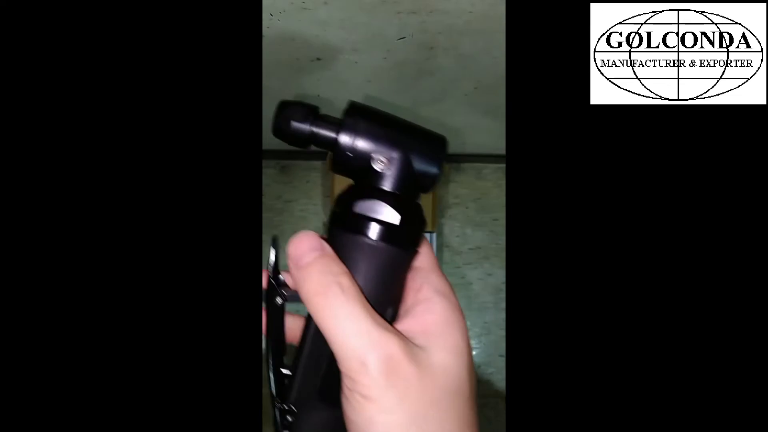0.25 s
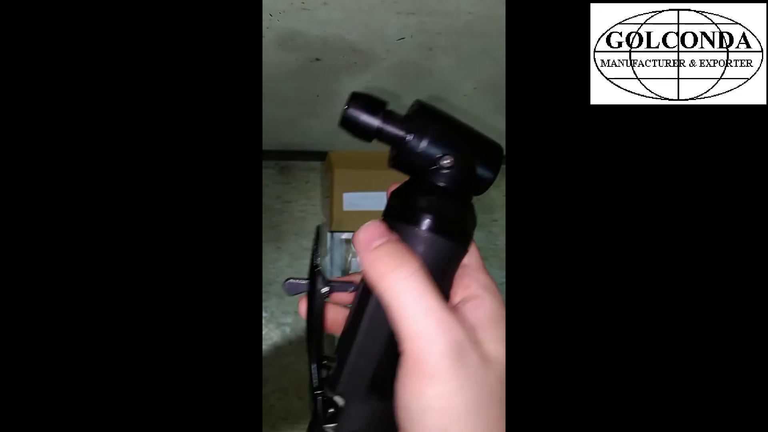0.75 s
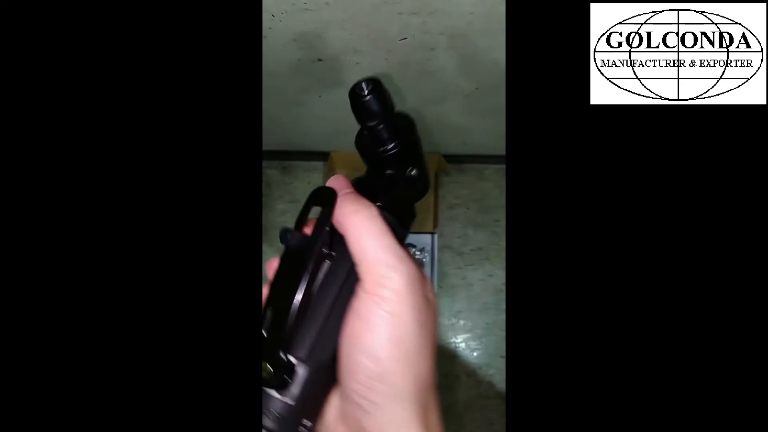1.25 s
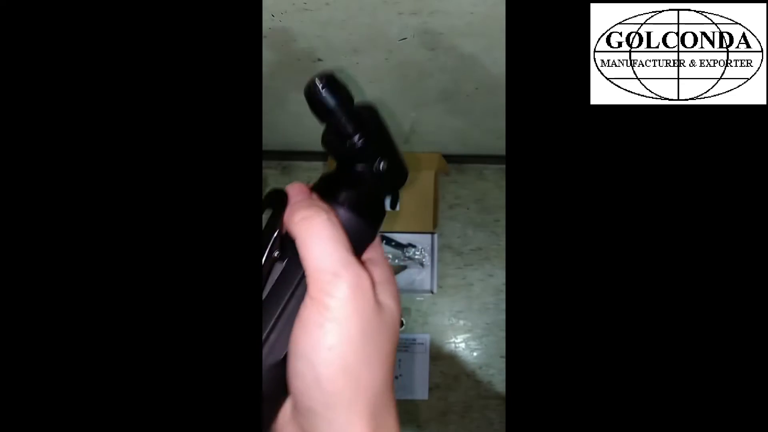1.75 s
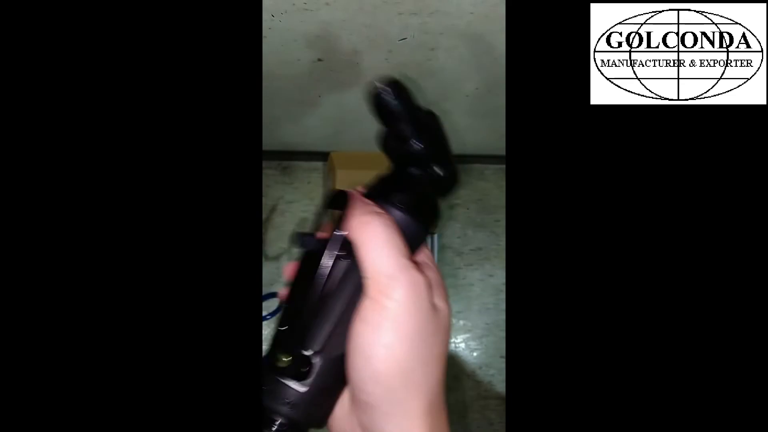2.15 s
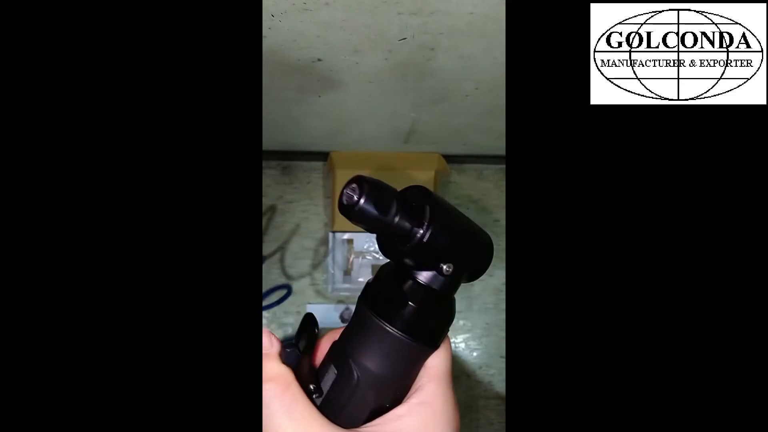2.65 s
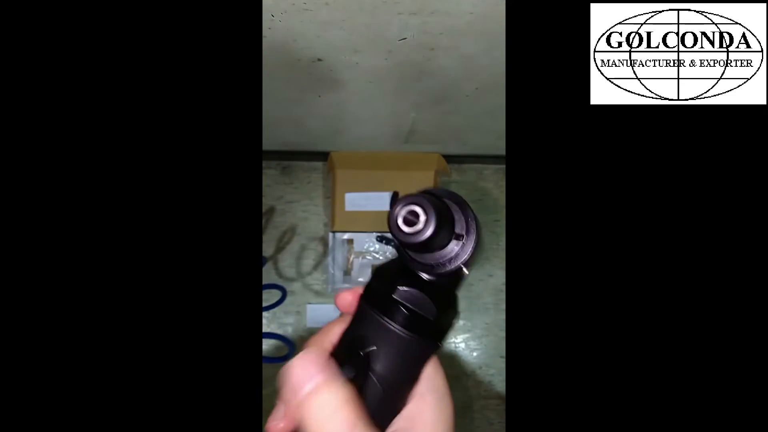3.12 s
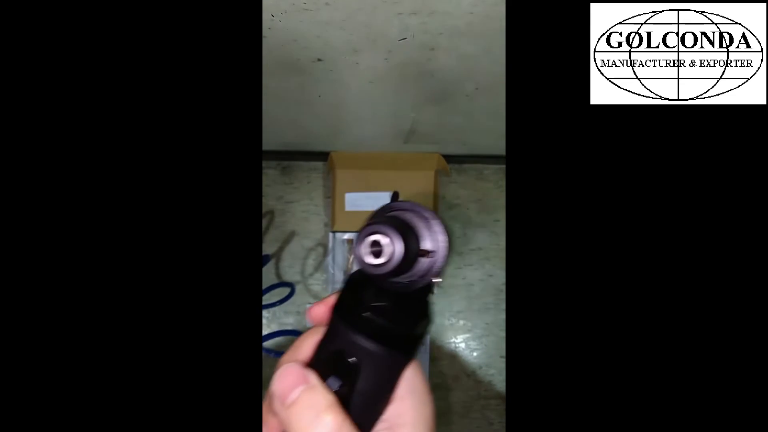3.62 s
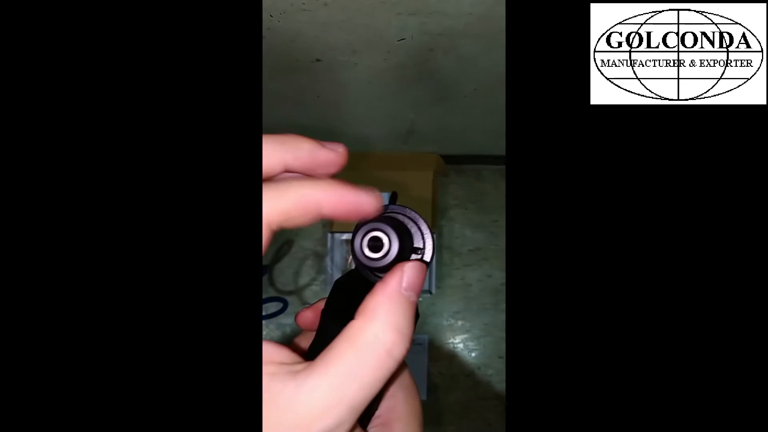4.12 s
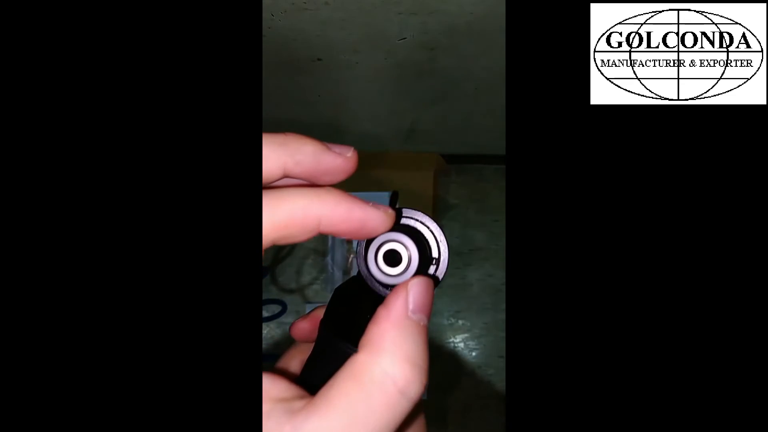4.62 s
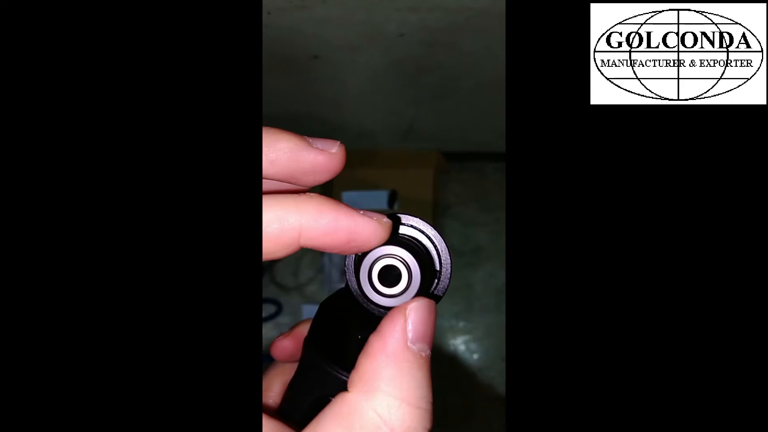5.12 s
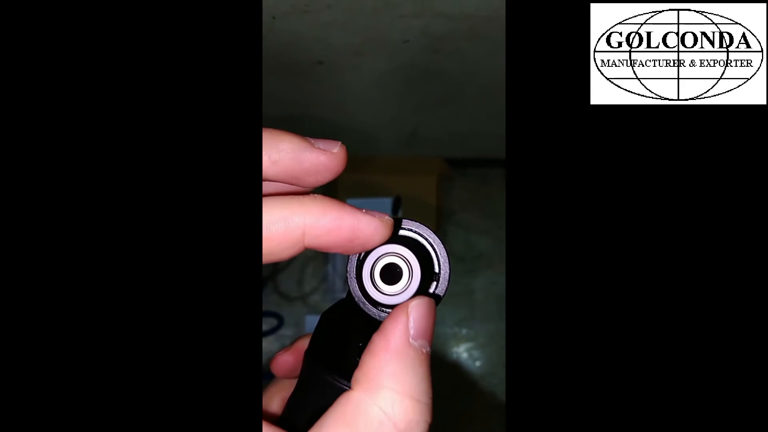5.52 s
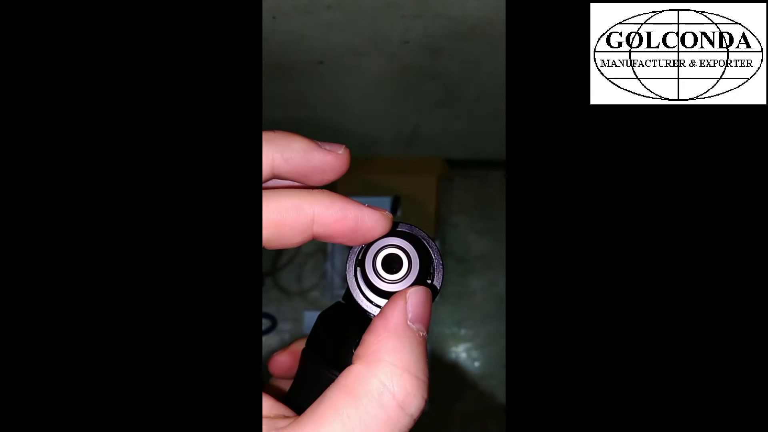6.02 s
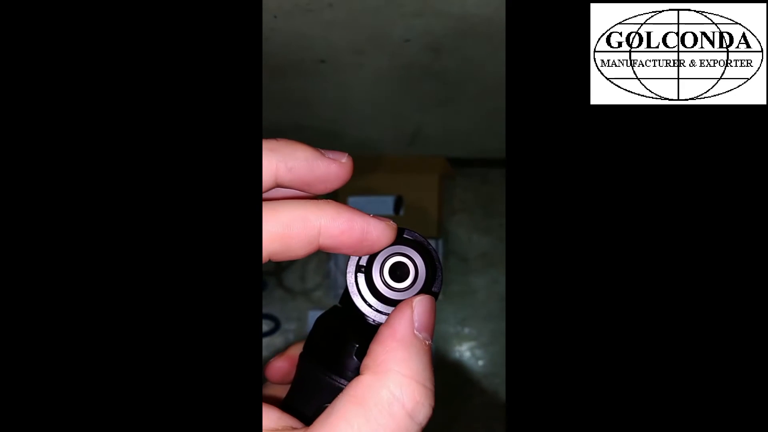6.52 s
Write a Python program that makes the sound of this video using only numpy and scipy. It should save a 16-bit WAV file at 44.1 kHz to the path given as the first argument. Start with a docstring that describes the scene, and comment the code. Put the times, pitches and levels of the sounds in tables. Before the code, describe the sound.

An air hose snaps onto a pneumatic grinder with clicks and a burst of air; two quick revs lead into a steady, shrill whine.

```python
"""Air die grinder in a workshop

Close up on one microphone, left channel only. The hose coupler clicks, leaks and seats with a blast
of air that buffets the microphone. The throttle is blipped twice, then held: the four-vane motor
whines on its shaft orders over the exhaust hiss, and hoots each time it coasts."""
import sys
import numpy as np
from scipy import signal
from scipy.fft import rfft, irfft, next_fast_len
from scipy.io import wavfile
from scipy.ndimage import uniform_filter1d

SR = 44100
rng = np.random.default_rng(int(sys.argv[2]) if len(sys.argv) > 2 else 0)


def persist_wave(psi):
    """Save psi, clipped to +-1, as 16-bit WAV."""
    counts = np.round(np.clip(psi, -1, 1) * 32767).astype(np.int16)
    wavfile.write(sys.argv[1], SR, np.atleast_2d(counts).T)


N = 298116
TIME = np.arange(N) / SR
VANES = 4

# throttle presses; the surge is extra speed from pressure stored in the hose:
# open_s, shut_s, surge_turns_per_s, pickup_hoot_db
PRESSES = [(2.9405, 3.123, 140, -27), (3.185, 3.376, 96, -24), (3.467, 7, 76, -18.5)]
# colour of the air leaving the muffler: frequency_hz, level_db
EXHAUST_SPECTRUM = [(20, -7.5), (70, -33.5), (150, -21), (400, -20.5), (800, -20), (1100, -17),
                    (1500, -15.5), (3000, -11), (6000, -9.5), (8000, -4.5), (11400, -0.5), (12700, -1),
                    (13600, -6), (15600, -7)]
# bright colour of the cracks, scratches and brief hisses: frequency_hz, level_db
BRIGHT_SPECTRUM = [(200, -25), (600, -19), (1200, -8.5), (2200, -10), (4000, -3.5), (6000, -8),
                   (8400, -7.5), (10600, 4), (12500, -4), (15800, -15)]


def grinder(valve_open_s=.003, drain_db_per_s=201, coast_db=-13.5, coast_power=1.26, pickup_s=.007):
    """The throttle feeds whine and exhaust; the vanes hoot while the rotor coasts or picks up."""
    speed, angle = rotor()
    spans = [(opened, shut) for opened, shut, *_ in PRESSES]
    airflow = np.max([held(*span, drain_db_per_s, valve_open_s) for span in spans], axis=0)
    pressed = sum((TIME > opened) & (TIME < shut) for opened, shut in spans)
    released = butter(1. - pressed, 80, "low")
    coast = amp(coast_db) * released * (speed / speed[-1]) ** coast_power
    pickup = sum(amp(db) * held(opened, opened + pickup_s, fade_db_per_s=380, attack_s=pickup_s)
                 for opened, _, _, db in PRESSES)
    return airflow * (whine(speed, angle) + exhaust(angle)) + (coast + pickup) * hoot(angle)


def rotor(spin_up_s=.04, coast_s=.052, hose_sag_s=.289):
    """Each press spins the rotor up to a speed that sags with hose pressure; released, it coasts."""
    # free speed on the steady air supply: time_s, turns_per_s
    supply_speeds = [(4.1, 234.5), (4.65, 233.9), (5, 234.6), (5.6, 235), (5.9, 238.1), (6.1, 238.8),
                     (6.4, 238), (6.7, 239.4)]
    steady, = curves(supply_speeds)
    speed = np.zeros(N)
    for opened, shut, surge, _ in PRESSES:
        driven_s = np.clip(TIME - opened, 0, shut - opened)
        target = steady + surge * np.exp(-driven_s / hose_sag_s)
        running = target + (np.interp(opened, TIME, speed) - target) * np.exp(-driven_s / spin_up_s)
        run_down = np.exp(-np.maximum(TIME - shut, 0) / coast_s)
        speed = np.where(TIME < opened, speed, running * run_down)
    speed = np.abs(speed) * (1 + .0004 * wobble(25))
    return speed, 2 * np.pi * np.cumsum(speed) / SR


def whine(speed, angle, weak_db=-39, swell_share=.29, full_flutter_order=22):
    """Vanes and bevel gears sound on shaft orders; the grip decides which reach the microphone."""
    # the hand round the head, 0 open to 1 cupped: time_s, cupping
    grip = [(3.5, 0), (3.7, .3), (3.9, 0), (4.15, .15), (4.6, 1), (5.4, 1), (5.6, .7), (5.72, 0)]
    # multiples of 4 are the vanes, the rest shaft and gears: shaft_order, open_db, cupped_db
    strong_orders = [(1, -48, -48), (2, -50, -50), (3, -50, -56), (4, -35.7, -32.7), (8, -37, -51),
                     (12, -39.5, -36), (16, -37.5, -33.5), (18, -40, -39), (19, -41, -39), (20, -38, -32.5),
                     (24, -37, -41), (28, -41, -43), (32, -39, -54), (35, -34, -42), (36, -33, -38),
                     (37, -37, -40), (39, -38, -44), (40, -32, -26), (43, -31, -26), (44, -38, -50),
                     (46, -35, -52), (47, -28, -29), (48, -33, -29), (51, -34, -42), (52, -29, -25.5),
                     (53, -40, -31), (56, -36, -32), (60, -38, -31)]
    # the lowest vane tone swells and sinks: time_s, level_db
    vane_swell = [(3.0, 6), (3.5, 6.5), (3.72, 12), (3.88, 2.5), (4.2, 5.5), (4.35, -1.5), (4.65, 2.5),
                  (5.3, 1), (5.6, 2.5), (5.9, -1.5), (6.45, -2), (6.68, 2.5)]
    cupping, = curves(grip)
    swell_db, = curves(vane_swell)
    strong_db = {round(order): levels for order, *levels in strong_orders}
    # the turbulent jet flutters and blurs the high orders most
    flutter = amp(.8 * wobble(2) + 1.4 * wobble(9)) * (1 + .2 * wobble(110))
    blur = .0058 * wobble(70)
    shifted = lambda curve: np.roll(curve, rng.integers(N))  # each order wavers on its own
    speed_ratio = speed / speed[-1]
    high_gain = amp(swell_share * swell_db) / np.maximum(speed_ratio, 1) ** 2
    tone = np.zeros(N)
    for order in range(1, 67):
        muffler_db = along(EXHAUST_SPECTRUM, order * speed[-1])
        if order in strong_db:
            gain = np.interp(cupping, [0, 1], amp(strong_db[order]))
        else:  # unequal vanes fill the other orders weakly
            gain = amp(weak_db + muffler_db + rng.normal(0, 2.3))
        if order == VANES:
            gain = gain * amp(swell_db)
        else:  # the other orders slide over the muffler's colour
            colour = amp(along(EXHAUST_SPECTRUM, order * speed[::64]) - muffler_db)
            gain = gain * np.repeat(colour, 64)[:N]
        if order > 3 * VANES:  # high orders share the swell and weaken when the rotor overshoots
            gain = gain * high_gain
        phase = order * (angle + shifted(blur)) + 2 * np.pi * rng.random()
        depth = min(order / full_flutter_order, 1)
        tone += gain * (1 + depth * (shifted(flutter) - 1)) * np.sin(phase)
    return np.sqrt(2) * tone * np.clip(speed_ratio, 0, 1) ** 2


def exhaust(angle, chop=.11, uneven=.032):
    """Each vane lets out a puff of hiss, unevenly round the turn."""
    # the jet at full throttle: time_s, level_db
    jet_levels = [(2.95, -15.5), (3.3, -15), (3.6, -17), (4.0, -18.5), (4.5, -19), (5.4, -17.5),
                  (5.8, -17.5), (6.2, -17.5), (6.7, -17)]
    jet_db, = curves(jet_levels)
    puffs = 1 + chop * np.cos(VANES * angle) + uneven * np.cos(angle)
    hiss = hand_echoes(noise(EXHAUST_SPECTRUM))
    return unit(hiss * puffs) * amp(jet_db + 1.2 * wobble(14))


def hand_echoes(hiss, depth_db=1.3):
    """Echoes off the moving hands, heard as a slowly shifting colour in the hiss."""
    spectra = signal.stft(hiss, nperseg=512)[2]
    patches = uniform_filter1d(rng.standard_normal(spectra.shape), size=4, axis=0)
    patches = uniform_filter1d(patches, size=70, axis=1)
    return signal.istft(spectra * amp(depth_db * unit(patches)), nperseg=512)[1][:N]


def hoot(angle, rough=.4, uneven=.11, muffler_hz=1250, chuff_db=-13):
    """The vanes pump air, a rough siren behind the muffler whose pitch follows the rotor."""
    # the siren's tones: shaft_order, level_db
    siren_orders = [(4, -5), (8, -7.5), (12, -13), (16, -7.5), (20, -16)]
    # the pumped air: frequency_hz, level_db
    chuff_spectrum = [(100, -27), (400, -30), (1200, 2.5), (2200, -7), (6000, -6), (15000, -43)]
    siren = unit(sum(amp(db) * np.sin(round(order) * angle) for order, db in siren_orders))
    siren *= 1 + rough * wobble(300) + uneven * np.sin(angle)
    chuff = amp(chuff_db) * noise(chuff_spectrum) * (1 + .5 * np.cos(VANES * angle))
    return butter(siren, muffler_hz, "low") + chuff


def clicks(gain_db=-8, ring_db=-21, crack_t60_s=.011, split_hz=4500):
    """Each contact cracks, sounds the struck part's note and rings the steel; blunt ones clack lower."""
    # coupler and lever contacts: start_s, level_db, clack_db, pitch_hz
    contacts = [(0.55, -35, -28, 4900), (0.8828, -22, -10, 4930), (0.9157, -27, -18, 5300),
                (0.9493, -34.5, 1, 4900), (0.999, -15, -10.5, 5400), (1.4382, -18.5, 3.5, 3900),
                (1.5508, -5.5, -16, 3880), (1.557, -18, -20, 3900), (1.5969, -22, -5, 4120),
                (1.6043, -13.5, -7, 3870), (1.609, -16, -27, 3140), (1.6299, -30, -2, 3960),
                (1.6422, 1, -14, 4200), (1.6454, -14, -22.5, 4580), (1.907, -36, -24, 9900),
                (2.2799, -13.5, -6, 5400), (2.3081, -23.5, -15, 5160), (2.551, -43, -4, 5440)]
    # modes of the steel coupler: pitch_hz, level_db, t60_s
    steel_modes = [(1230, -11, 0.028), (2010, -3, 0.04), (3400, -7.5, 0.069), (3870, 1, .023),
                   (5600, -10.5, 0.076), (6670, -5, 0.013), (7660, -5, 0.018), (9060, -4, .015),
                   (10600, -2.5, .012), (12900, -4, .012)]
    out, t = np.zeros(N + SR), np.arange(SR // 4) / SR
    mode = lambda hz, db, t60: amp(db - 60 * t / t60) * np.sin(2 * np.pi * hz * t)
    for start_s, level_db, clack_db, pitch_hz in contacts:
        ring = sum(mode(hz * rng.normal(1, .019), ring_db + db + rng.normal(0, 2), t60)
                   for hz, db, t60 in steel_modes)
        crack = noise(BRIGHT_SPECTRUM, size=len(t)) * amp(-60 * t / crack_t60_s)
        note = mode(pitch_hz, db=-7, t60=.008)
        hit = (crack + ring + note) * (1 - np.exp(-t / .0003))
        clack = amp(clack_db + 6) * butter(hit, split_hz, "low")
        hit = butter(hit, split_hz, "high") - clack
        out[round((start_s + .0007) * SR):][:len(t)] += amp(level_db + gain_db) * hit
    return out[:N]


def coupler_blast():
    """Line pressure escapes round the plug until it seals."""
    # the blast as the plug seats, a spit as the seal shuts: start_s, stop_s, level_db, fade_db_per_s
    escapes = [(1.962, 2.066, -14.5, 640), (2.122, 2.126, -25, 3500)]
    # the escaping air: frequency_hz, level_db
    air_spectrum = [(100, -14), (400, -12), (1000, -10), (5000, -13.5), (9000, -8), (11000, 1),
                    (13000, -4.5), (15800, -6)]
    return noise(air_spectrum) * bursts(escapes, attack_s=.004) * amp(.68 * wobble(140))


def microphone_gust(start_s=1.969, stop_s=2.067, push_db=-20):
    """The jet pushes on the diaphragm, which springs back afterwards; eddies rumble over it."""
    # stray air on the microphone: start_s, stop_s, level_db, fade_db_per_s
    buffets = [(1.964, 1.985, -21.5, 241), (2.948, 3.5, -42.5, 21), (3.045, 3.06, -34.5, 300)]
    # the eddies' rumble: frequency_hz, level_db
    eddy_spectrum = [(20, 3), (80, -7.5), (250, -9), (700, -15.5), (2000, -38), (6000, -92)]
    pressure = butter(1. * ((TIME > start_s) & (TIME < stop_s)), 50, "low")
    push = signal.lfilter(*signal.butter(1, 7, "high", fs=SR), -amp(push_db) * pressure)
    return push + noise(eddy_spectrum) * bursts(buffets, attack_s=.008)


def handling(grain_db=3):
    """Fingers and plug scratch the metal, air leaks just before and after seating, a palm bumps."""
    # four scratches, then two hisses of leaking air: start_s, stop_s, level_db, fade_db_per_s
    scratches_and_leaks = [(.05, .12, -71, 250), (.51, .55, -67, 100), (.79, 1.0, -61, 59),
                           (1.555, 1.645, -44.5, 300), (1.92, 1.96, -65.5, 100), (2.2, 2.3, -60, 47)]
    # the palm on the handle: start_s, stop_s, level_db, fade_db_per_s
    bumps = [(.975, .992, -55, 600)]
    # its dull thud: frequency_hz, level_db
    palm_spectrum = [(150, -20), (450, -1), (900, -1), (2000, -12), (4000, -40)]
    grainy_hiss = unit(noise(BRIGHT_SPECTRUM) * amp(grain_db * wobble(250)))
    thud = noise(palm_spectrum) * bursts(bumps, attack_s=.0055)
    return grainy_hiss * bursts(scratches_and_leaks, attack_s=.023) + thud


def seal_leak(seep_db=-70, drift_db=2, waver=.007, wander=.012):
    """The seal hisses faintly and chirps; each chirp swells and fades on an unsteady arch of pitch."""
    # air seeping at the coupler: frequency_hz, level_db
    seep_spectrum = [(3000, -21), (8000, -12), (10000, -0.5), (11200, 0), (12800, -6), (15800, -12.5)]
    # thin chirps of the seal: middle_s, length_s, middle_hz, drop_at_ends_hz, level_db
    chirps = [(.31, 0.23, 10750, 501, -68), (.42, .12, 14550, -600, -69), (.67, .14, 13200, -600, -71),
              (0.75, .11, 10650, 704, -67), (2.514, 0.42, 11650, 899, -62), (2.5, 0.33, 10750, 600, -67)]
    out = noise(seep_spectrum) * amp(seep_db + drift_db * wobble(8))
    for middle_s, length_s, middle_hz, drop_hz, db in chirps:
        arch = np.minimum(np.abs(2 * (TIME - middle_s) / length_s), 1) ** 2
        pitch_hz = (middle_hz - drop_hz * arch) * (1 + waver * wobble(300) + wander * wobble(25))
        out += amp(db) * (1 - arch) * np.sin(2 * np.pi * np.cumsum(pitch_hz) / SR)
    return out


def workshop_reverb(x):
    """The room's diffuse answer, each frequency dying at its own speed."""
    # decay of the workshop: frequency_hz, t60_s
    decay_times = [(200, .35), (1500, 0.31), (5000, 0.25), (10000, 0.31), (15000, 0.13)]
    hz, t, spectra = signal.stft(rng.standard_normal((SR * 3) // 5), SR, nperseg=256)
    decay = amp(-60 * t / along(decay_times, hz)[:, None])
    tail = signal.istft(spectra * decay, SR, nperseg=256)[1]
    response = np.pad(tail, (SR // 250, 0)) / np.linalg.norm(tail)  # arrives 4 ms late
    return signal.fftconvolve(x, response)[:N]


def room_tone():
    """A faint, steady rumble under the tool."""
    # the quiet workshop: frequency_hz, level_db
    room_spectrum = [(12, -30.5), (20, -1.5), (221, -18.5), (247, -14), (300, -25.5), (419, -24),
                     (482, -28), (775, -30), (843, -31.5), (916, -31.5), (4140, -46), (15800, -46.5)]
    return amp(-53) * noise(room_spectrum)


def amp(db):
    """Decibels to gain."""
    return 10 ** (np.asarray(db) / 20)


def unit(x):
    """Scale to rms 1."""
    return x / np.sqrt(np.mean(x ** 2) + 1e-20)


def along(points, hz):
    """Read (frequency_hz, value) points on a log frequency axis."""
    knots_hz, values = np.transpose(points)
    return np.interp(np.log(hz + 1), np.log(knots_hz + 1), values)


def curves(rows):
    """One value per sample for each column after the time."""
    times_s, *columns = np.transpose(rows)
    return [np.interp(TIME, times_s, column) for column in columns]


def wobble(rate):
    """A random curve with rate knots a second."""
    position = np.arange(N) * rate / SR
    knots = rng.standard_normal(int(position[-1]) + 2)
    return np.interp(position, np.arange(len(knots)), knots)


def filtered(x, response):
    """Shape x by a gain that depends on frequency."""
    size = next_fast_len(len(x) + 8192)
    return irfft(rfft(x, size) * response(np.fft.rfftfreq(size, 1 / SR)), size)[:len(x)]


def noise(spectrum, size=N):
    """Coloured noise of rms 1."""
    return unit(filtered(rng.standard_normal(size), lambda hz: amp(along(spectrum, hz))))


def butter(x, hz, kind):
    """A gentle causal low-pass or high-pass."""
    return signal.sosfilt(signal.butter(2, hz, kind, fs=SR, output="sos"), x)


def held(start_s, stop_s, fade_db_per_s, attack_s):
    """Attack, hold and a release that is straight in dB."""
    attack = np.clip((TIME - start_s) / attack_s, 0, 1)
    return attack * amp(-fade_db_per_s * np.maximum(TIME - stop_s, 0))


def bursts(rows, attack_s):
    """The summed envelope of several held events."""
    return sum(amp(db) * held(start, stop, fade, attack_s) for start, stop, db, fade in rows)


def scene():
    """Tool and coupler close to the microphone, the workshop behind them."""
    motor, contacts, air = grinder(), clicks(), coupler_blast()
    into_room = amp(-11.5) * motor + amp(-13) * contacts + amp(-5.5) * butter(air, 4000, "high")
    reverb = workshop_reverb(into_room)
    close = motor + contacts + air + handling() + seal_leak() + microphone_gust()
    return (close + reverb + room_tone())[None]


def record(dry):
    """The microphone feeds the left channel only; peaks are rounded off, then the band is limited."""
    ceiling, top_hz = .82, 15850
    left = 2 * dry[0]
    left = left / (1 + np.abs(left / ceiling) ** 8) ** (1 / 8)
    left = filtered(left, lambda hz: 1 / (1 + (hz / top_hz) ** 500))
    return np.array([left, np.zeros(N)])


dry = scene()
out = record(dry)
persist_wave(out)
```